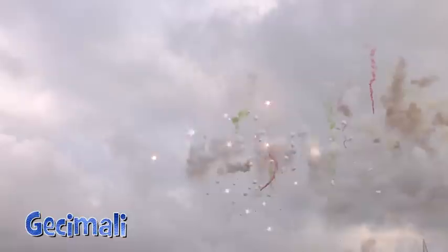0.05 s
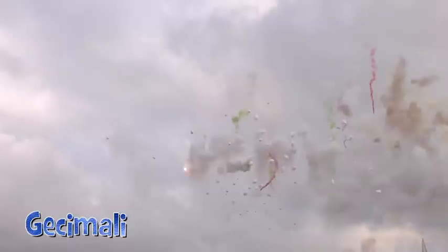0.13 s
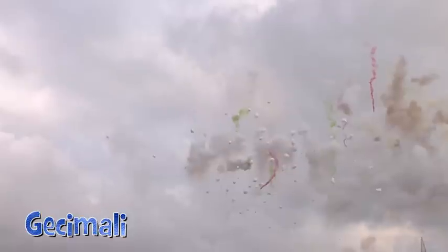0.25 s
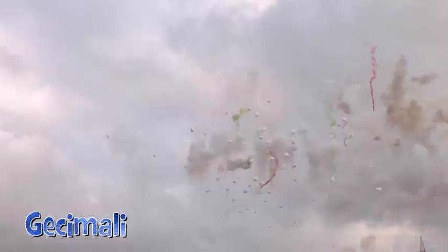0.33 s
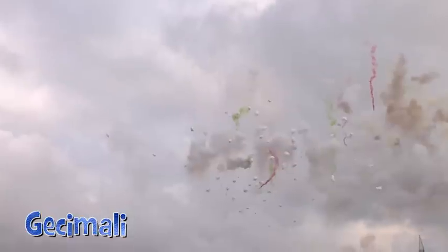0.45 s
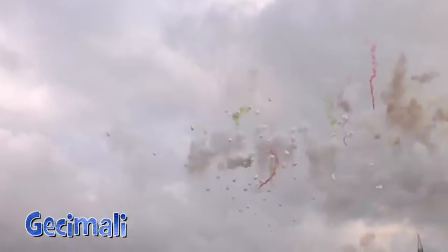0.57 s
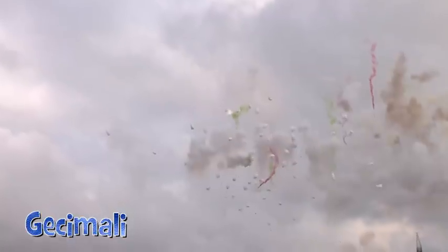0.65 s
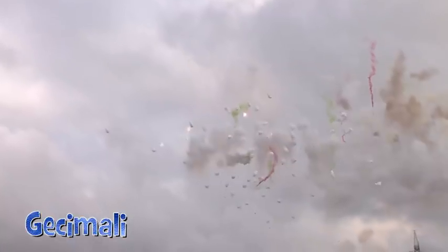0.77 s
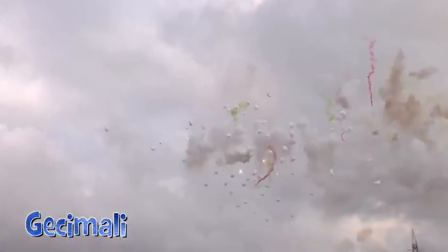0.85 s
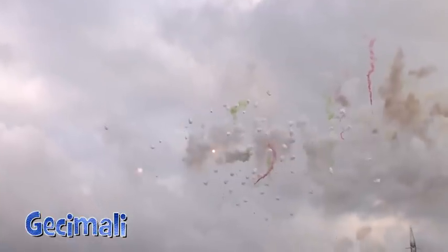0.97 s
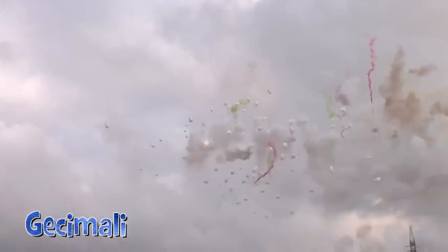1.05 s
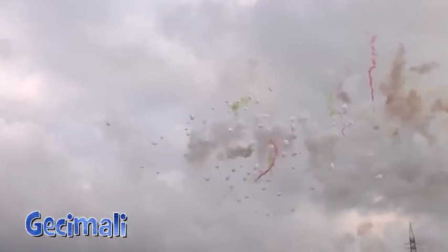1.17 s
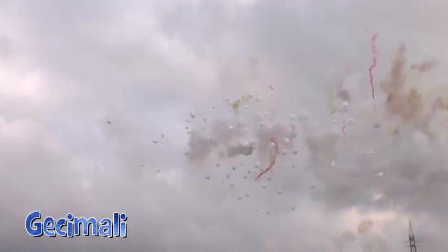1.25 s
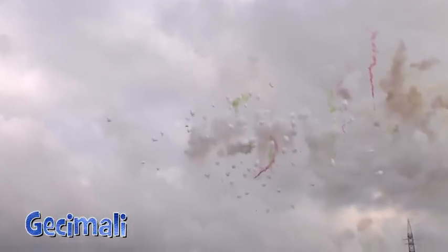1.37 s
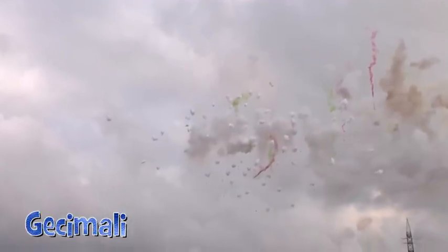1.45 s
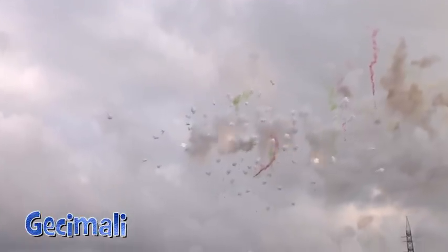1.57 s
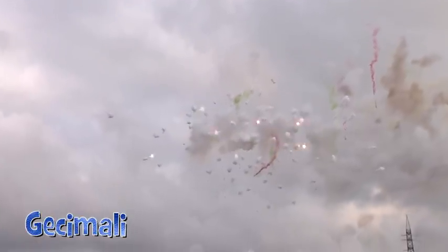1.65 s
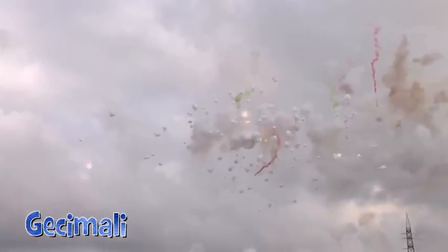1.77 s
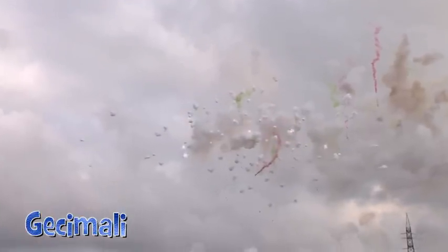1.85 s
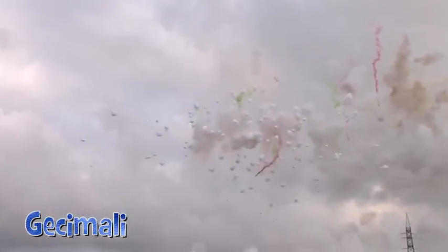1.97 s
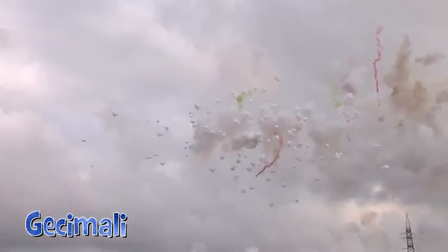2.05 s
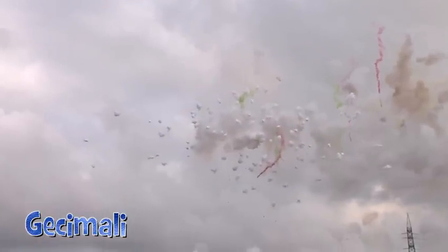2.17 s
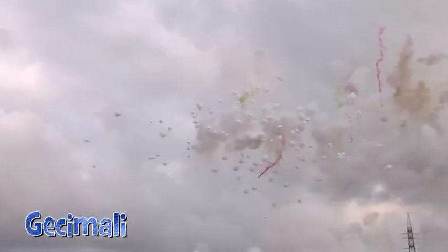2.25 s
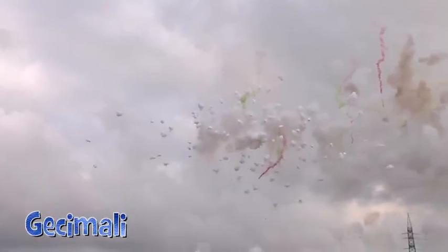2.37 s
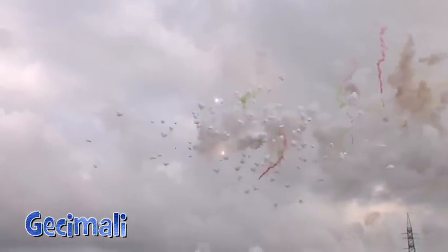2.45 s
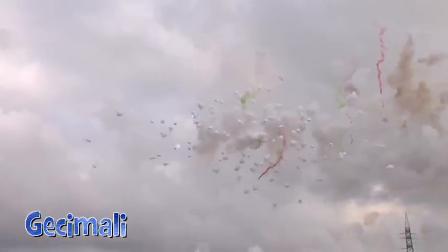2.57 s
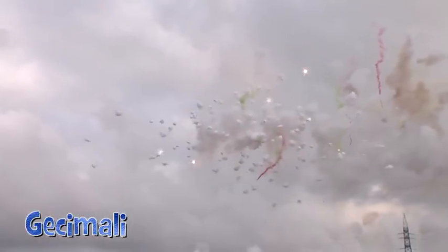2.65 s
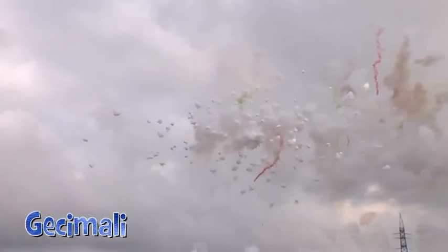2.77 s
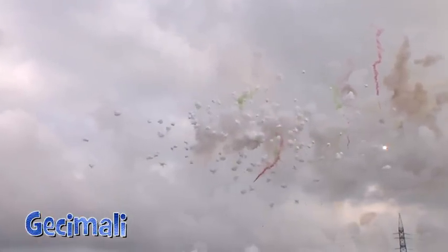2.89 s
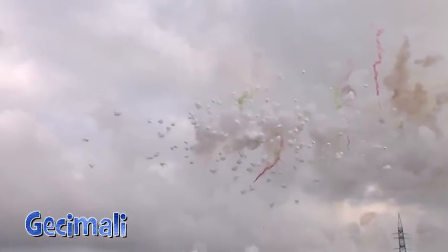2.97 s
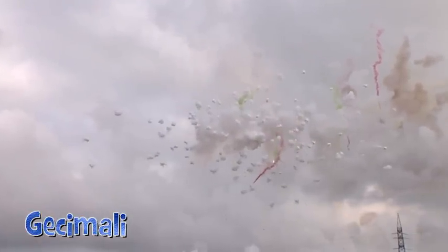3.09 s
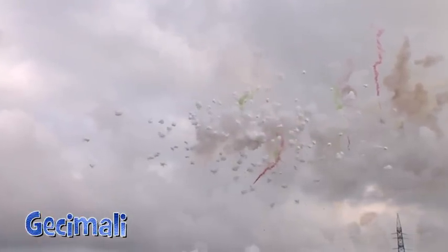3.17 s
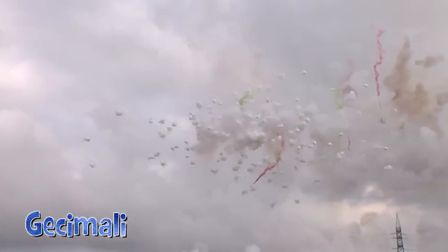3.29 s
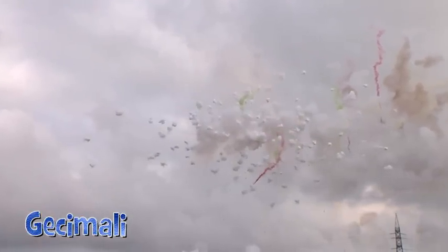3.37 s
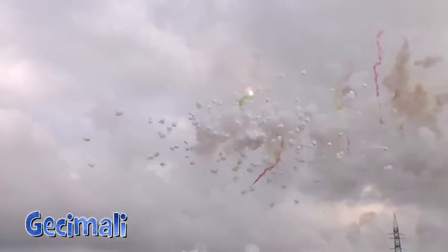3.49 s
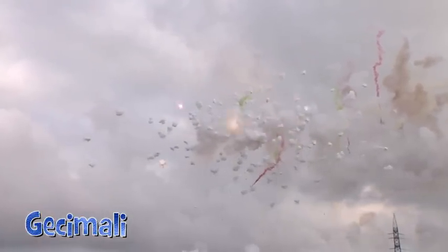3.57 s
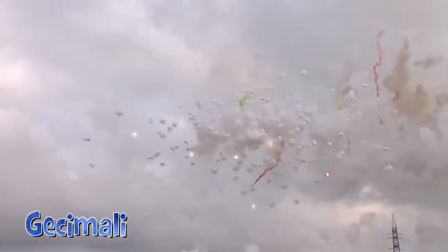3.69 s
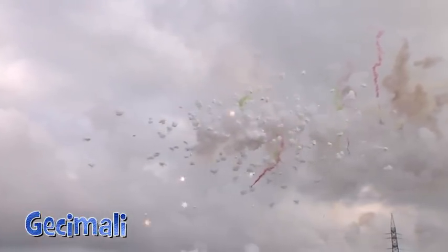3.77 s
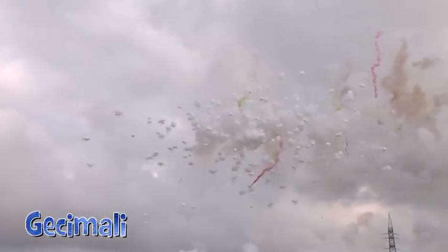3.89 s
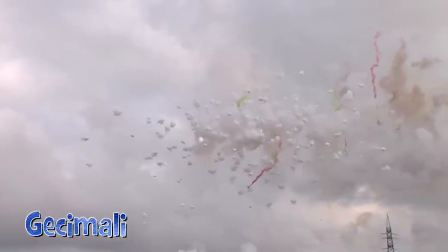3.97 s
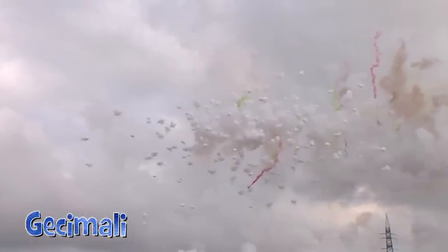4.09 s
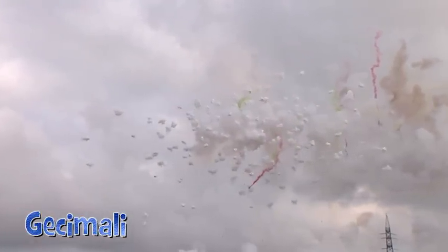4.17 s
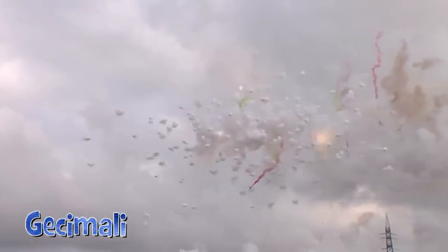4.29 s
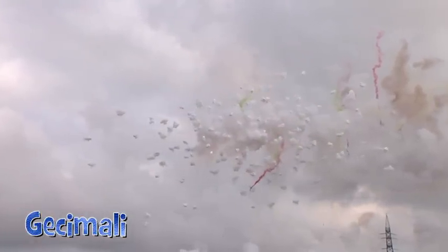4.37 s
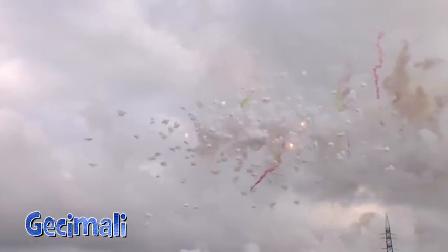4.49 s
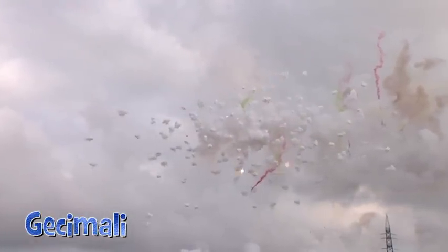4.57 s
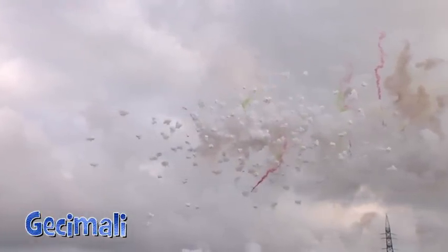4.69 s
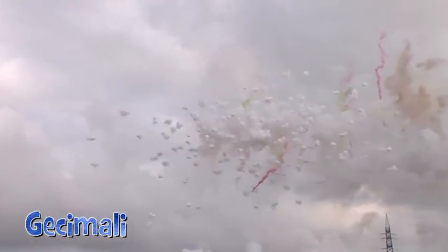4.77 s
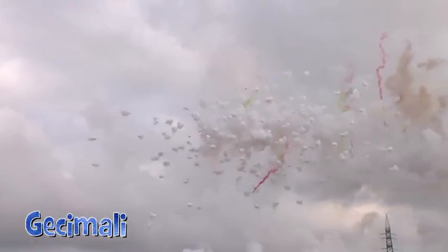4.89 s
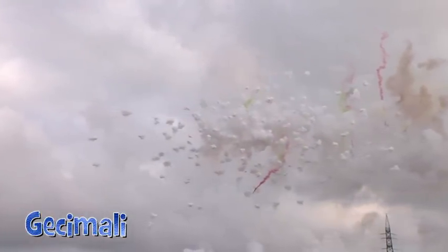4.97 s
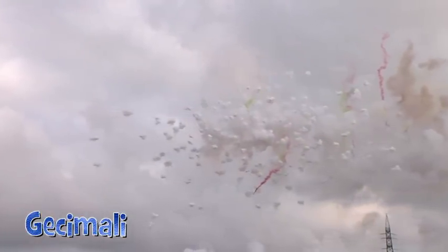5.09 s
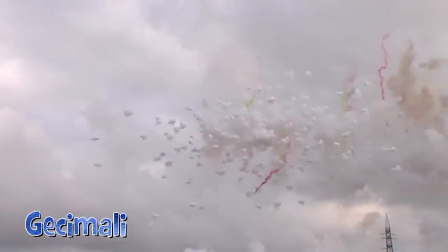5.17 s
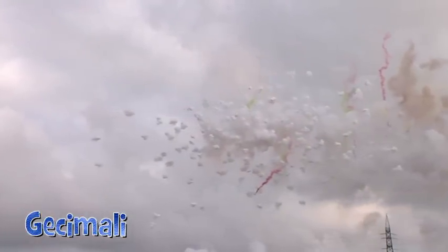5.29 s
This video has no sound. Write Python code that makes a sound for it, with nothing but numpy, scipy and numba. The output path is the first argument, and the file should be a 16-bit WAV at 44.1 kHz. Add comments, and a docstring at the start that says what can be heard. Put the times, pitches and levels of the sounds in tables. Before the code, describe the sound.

Outdoors, the roll of earlier shells already rumbles, then six aerial firework shells break about a second apart. Each starts with a hard bang and scatters into irregular smaller bangs and tight rattles. Dense slapping echoes and a lumpy far roll fill the gaps. The small stereo microphone overloads, sounds crunchy and clipped, and is louder on the left.

```python
"""The far roll of earlier shells is already in the air; then six aerial shells break overhead, each scattering salutes.
Every bang is a pressure wave with a ground bounce and a low boom. Filtered noise makes the dense echoes
of nearby walls and the long, lumpy roll of the far surroundings. Both microphone ports overload,
the left one first, and a slow gain control turns them down."""
import sys
import numpy as np
from scipy import signal
from scipy.fft import rfft, irfft
from scipy.io import wavfile
from scipy.ndimage import uniform_filter1d
from numba import njit

SR = 44100
rng = np.random.default_rng(int(sys.argv[2]) if len(sys.argv) > 2 else 0)


def log_audio(samples):
    """Write samples as a 16-bit WAV file to the path given in sys.argv[1]."""
    # one column per channel
    frames = np.atleast_2d(samples).T
    # limit to full scale, then quantise
    limited = np.clip(frames, -1, 1)
    pcm = np.round(limited * 32767).astype(np.int16)
    wavfile.write(sys.argv[1], SR, pcm)


N = 235663


def undb(db):
    """Decibels to an amplitude factor; a doubled dB value gives power."""
    return 10 ** (np.asarray(db) / 20)


def along(table, hz):
    """Read a (Hz, value) table on a log-frequency axis."""
    table_hz, values = np.transpose(table)
    return np.interp(np.log(np.maximum(hz, 1)), np.log(table_hz), values)


def bins_hz():
    """Frequencies of a full-length spectrum, in Hz."""
    return np.fft.rfftfreq(N, 1 / SR)


def lowpass(x, order, hz):
    """Butterworth low-pass."""
    return signal.sosfilt(signal.butter(order, hz, fs=SR, output="sos"), x)


def colour(x, table):
    """Minimum-phase filter through (Hz, dB) points, via the cepstrum; unit power gain."""
    size = 8192
    log_gain = np.log(undb(along(table, np.fft.rfftfreq(size, 1 / SR))))
    cepstrum = irfft(log_gain)
    cepstrum[1:size // 2] *= 2  # fold onto positive time, so the filter is causal
    cepstrum[size // 2 + 1:] = 0
    taps = irfft(np.exp(rfft(cepstrum)))[:size // 2]
    taps = taps / np.sqrt(np.sum(taps ** 2))
    return signal.fftconvolve(x, taps[None], axes=-1)[:, :N]


def fade(x, seconds):
    """One-pole decay with the given time constant."""
    return signal.lfilter([1], [1, -np.exp(-1 / (seconds * SR))], x)


def fade_t60(energy, t60):
    """Energy decay that falls by 60 dB in t60 seconds."""
    return fade(energy, t60 / (2 * np.log(1000)))


def walk(count):
    """Random levels held 1 / count s and smoothed twice; spread near 1."""
    hold = int(SR / count)
    steps = np.repeat(rng.standard_normal(N // hold + 1), hold)
    return 1.3 * uniform_filter1d(uniform_filter1d(steps, hold), hold)[:N]


# Stereo width of the echoes. Each row: frequency in Hz, left-right correlation from 0 to 1.
PORT_LIKENESS = [(60, 1), (130, 0.99), (640, 0.98), (1400, 0.54), (3100, 0.7), (7000, 0.49)]


def diffuse():
    """Noise spectrum for two ports, nearly alike in the bass and less so in the treble."""
    like = np.clip(along(PORT_LIKENESS, bins_hz()), 0, 1)
    mid, side = rfft(rng.standard_normal((2, N)))
    opposite = np.array([[1], [-1]])
    return np.sqrt((1 + like) / 2) * mid + np.sqrt((1 - like) / 2) * side * opposite


# Bangs placed one by one, from loud to faint. Each row: start in seconds, relative strength in dB.
PLACED_BANGS = [(0.1424, 1), (0.176, -5.5), (0.1894, -12), (0.2492, -12), (0.2688, -0.5), (0.2968, -1),
                (0.351, -13), (0.411, -14), (0.4708, -15), (0.5104, -16.5), (0.5546, -15), (0.5727, -13),
                (0.617, -24.5), (0.8541, 3), (0.9007, -12), (0.916, -7.5), (0.9724, -4.5), (1.0167, -8.5),
                (1.0502, -2), (1.1008, -22), (1.2112, -1), (1.254, -1), (1.364, -31), (1.8376, 9.5),
                (1.8603, -14), (1.9361, -2), (1.993, -9), (2.0654, -11), (2.2407, -11), (2.2633, -8.5),
                (2.3195, -26), (2.6613, 5), (2.6991, -15.5), (2.7333, -19.5), (2.7846, -5), (2.8334, -4.5),
                (2.87, -11.5), (2.91, -12.5), (2.9303, 3), (2.972, -19), (2.9949, 0), (3.0644, -7),
                (3.1096, -13.5), (3.1271, -5), (3.1746, -7.5), (3.1951, -11), (3.27, -7), (3.315, -9),
                (3.716, 0), (3.78, 9), (3.8356, -2.5), (3.8867, -4), (4.0258, -8.5), (4.1076, -9.5),
                (4.1469, -14.5), (4.5455, 3), (4.5738, 0.5), (4.6199, -3), (4.6583, -8), (4.7178, 0),
                (4.7487, -2.5), (4.8642, -7.5), (4.9102, -30), (4.947, -9), (4.9652, -9)]
# Rattles: stretches of close-packed salutes, their times and strengths drawn at random.
# Each row: start in seconds, end in seconds, mean relative strength in dB.
RATTLE_STRETCHES = [(0.31, 0.46, -16.5), (1.066, 1.135, -13), (1.15, 1.185, -28), (1.266, 1.33, -16.5),
                    (1.87, 1.925, -4), (2.01, 2.2, -15.5), (2.678, 2.76, -9), (3.79, 4.01, -14),
                    (4.035, 4.095, -10), (4.165, 4.215, -29.5), (4.755, 4.84, -16), (4.975, 5.035, -25)]
RATTLE_GAP_S, GAP_SPREAD, RATTLE_SCATTER_DB = .015, .3, 3.5  # typical gap, its spread as a share, strength spread
BRIGHT_DB, BRIGHT_PER_DB = -2, -0.2551  # echo treble of a 0 dB bang, change per dB: small charges are sharper


def salutes():
    """Every bang as a row (s, strength dB, brightness dB): those placed one by one, and the random rattles."""
    chance = rng.standard_normal((len(RATTLE_STRETCHES), 30, 2))  # up to 30 bangs a rattle
    start, end, mean_db = np.transpose(RATTLE_STRETCHES)[:, :, None]
    gap = RATTLE_GAP_S * np.exp(GAP_SPREAD * chance[..., 0])
    s = start + np.cumsum(gap, axis=1) - gap[:, :1] / 2
    strength_db = mean_db + RATTLE_SCATTER_DB * chance[..., 1]
    inside = s < end
    rattle = np.transpose([s[inside], strength_db[inside]])
    rows = np.vstack([PLACED_BANGS, rattle])
    return np.column_stack([rows, BRIGHT_DB + BRIGHT_PER_DB * rows[:, 1]])


# Colour of the far roll. Each row: frequency in Hz, relative level in dB.
ROLL_COLOUR = [(20, -25), (64, -29.5), (86, -9.5), (115, -8), (140, -2), (185, -4), (260, -19),
               (320, -15.5), (450, -26.5), (530, -23), (850, -30), (1720, -32), (4870, -42.5),
               (15000, -64.5)]
# How long the far roll rings. Each row: frequency in Hz, time to fall 60 dB in seconds.
ROLL_DECAY = [(40, 20), (150, 2.53), (500, 5.2), (2000, 5.8), (6000, 3.9), (12000, 0.57)]
ROLL_DB, EARLIER_DB = -9, -3  # level of the roll; strength of the earlier shells within it


def roll(bangs, build_s=0.035, swell_db=-0.1, bass_lump_db=3.5, lump_db=1.6):
    """Far echoes: every bang feeds bands that swell and die away, the top treble soonest, in uneven lumps."""
    energy = np.zeros(N)
    s, db = bangs.T[:2]
    energy[(s * SR).astype(int)] = undb(2 * db)
    energy = fade(energy, build_s) / (build_s * SR)
    energy[0] += undb(2 * EARLIER_DB)  # earlier shells still roll
    octave = np.log2(np.maximum(bins_hz(), 1))
    spectrum = rfft(colour(irfft(diffuse(), N), ROLL_COLOUR))
    out, swell = 0, walk(count=18)  # one swell shared by all bands
    for centre in np.arange(4, 15, .75):  # band centres in octaves above 1 Hz
        centre_hz = 2 ** centre
        share = np.clip(1 - abs(octave - centre) / .75, 0, 1)  # overlapping triangles
        band = irfft(spectrum * share, N)
        power = fade_t60(energy, along(ROLL_DECAY, centre_hz))
        depth_db = bass_lump_db if centre_hz < 400 else lump_db
        lumps = undb(swell_db * swell + depth_db * walk(count=20))
        out = out + np.sqrt(power) * lumps * band
    return undb(ROLL_DB) * out


BLAST_DB = 14  # added to every bang's strength


def blasts(bangs, length_s=.003, ground_s=.008, ground_db=-1, air_hz=6900.0,
           boom_hz=155.1, boom_t60=0.087, boom_db=2.5):
    """An N-shaped pressure wave for each bang, again off the ground, over a short low boom; air dulls it all."""
    hits = np.zeros(N)
    s, db = bangs.T[:2]
    hits[(s * SR).astype(int)] = undb(db + BLAST_DB)
    crack = np.linspace(1, -1, int(length_s * SR))
    wave = np.zeros(SR // 10)
    wave[:len(crack)] += crack
    wave[int(ground_s * SR):][:len(crack)] += undb(ground_db) * crack
    t = np.arange(len(wave)) / SR
    boom_decay = np.exp(-np.log(1000) * t / boom_t60)
    wave += undb(boom_db) * np.sin(2 * np.pi * boom_hz * t) * boom_decay
    return lowpass(signal.fftconvolve(hits, wave)[:N], 1, air_hz)


# Colour of the near echoes. Each row: frequency in Hz, relative level in dB.
NEAR_COLOUR = [(15, -64), (25, -2.5), (66, -3), (93, -6), (191, 3.5), (250, -12.5), (344, 1), (450, -15),
               (501, -9), (1310, -24.5), (3350, -29), (6370, -33), (15000, -49.5)]
# Faint, dull slaps after the volleys. Each row: start in seconds, relative strength in dB,
# brightness in dB (treble against bass).
LATE_SLAPS = [(0.688, -21.5, -14), (3.442, -22, -10), (4.240, -18, -7), (5.102, -19, -11)]
NEAR_DB = 19  # level of the near echoes


def near_echoes(bangs, split_hz=490.0, bass_t60=0.1, treble_t60=0.093, field_t60=0.5, field_db=-19,
                bass_rise_s=0.0012, slap_db=2.0):
    """Dense, uneven echoes right after each bang: noise in two bands, the bass swelling in a little late."""
    s, db, bright_db = np.vstack([bangs, LATE_SLAPS]).T
    at = (s * SR).astype(int)
    bass, treble = np.zeros((2, N))  # energies
    bass[at] = undb(2 * db)
    treble[at] = undb(2 * (db + bright_db))
    bass = fade_t60(fade(bass, bass_rise_s) / (bass_rise_s * SR), bass_t60)
    field = undb(2 * field_db) * fade_t60(treble, field_t60)  # walls further off
    treble = fade_t60(treble, treble_t60) + field
    noise = colour(irfft(diffuse(), N), NEAR_COLOUR)
    low = lowpass(noise, 2, split_hz)
    high = noise - low
    slaps = undb(slap_db * walk(count=200))  # single walls stand out in the treble
    return undb(NEAR_DB) * (low * np.sqrt(bass) + high * slaps * np.sqrt(treble))


def shade(x, table):
    """The right port faces away and hears less, by a (Hz, dB) table."""
    right = irfft(rfft(x[1]) * undb(along(table, bins_hz())), N)
    return np.array([x[0], right])


# Right port for sound from above. Each row: frequency in Hz, level against the left in dB.
OVERHEAD_SHADE = [(60, -9), (300, -6.5), (2000, -7), (12000, -13.5)]
# Right port for far echoes. Each row: frequency in Hz, level against the left in dB.
FAR_SHADE = [(60, -11.5), (200, -13), (700, -16), (1300, -17.5), (4400, -20.5), (15000, -14)]


def scene():
    """All that reaches the two ports: bangs and near echoes from above, the roll from afar."""
    bangs = salutes()
    overhead = blasts(bangs) + near_echoes(bangs)
    return shade(overhead, OVERHEAD_SHADE) + shade(roll(bangs), FAR_SHADE)


@njit
def follow(x, start, attack, release):
    """Level follower that rises and falls at its own speeds."""
    out, e = np.empty(len(x)), start
    for i in range(len(x)):
        e += (x[i] - e) * (attack if x[i] > e else release)
        out[i] = e
    return out


# Where the ports saturate: the left port's ceiling, then the right's, both in dB against an amplitude of 1.
PORT_CEILING = [2, -2]
TOP_HZ = 15700  # upper edge of the recorder


def record(dry, knee=2.53, grain_db=-14, grain_hz=3740.0, bass_cut_hz=60.0):
    """The ports saturate, noise grows with overload, one late gain control acts on both, then clip and top cut."""
    ceiling = undb(PORT_CEILING)[:, None]
    ports = dry / (1 + abs(dry / ceiling) ** knee) ** (1 / knee)
    grain = lowpass(rng.standard_normal((2, N)), 2, grain_hz)
    grain = undb(grain_db) * grain / grain.std()
    ports = ports * (1 + grain * (ports / ceiling) ** 8)  # low-passed noise grows steeply with overload
    ports = signal.sosfilt(signal.butter(1, bass_cut_hz, "high", fs=SR, output="sos"), ports)

    attack_s, release_s, lag_s = .1, .35, .07
    threshold_db, slope = -12, .9  # slope 1 would hold the level flat
    level = follow(abs(ports).mean(0), .29, 1 / (attack_s * SR), 1 / (release_s * SR))
    level = follow(level, level[0], 1 / (lag_s * SR), 1 / (lag_s * SR))  # the gain answers late
    gain = np.minimum(undb(threshold_db) / level, 1) ** slope
    clipped = np.clip(gain * ports, -1, 1)  # the converter clips
    top_cut = signal.ellip(8, .2, 70, TOP_HZ, fs=SR, output="sos")
    return np.clip(signal.sosfilt(top_cut, clipped), -1, 1)


dry = scene()
out = record(dry)
log_audio(out)
```